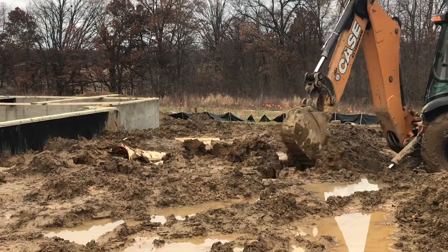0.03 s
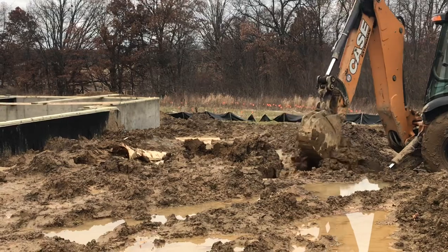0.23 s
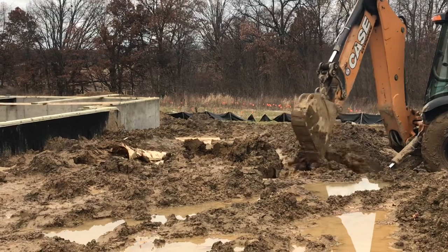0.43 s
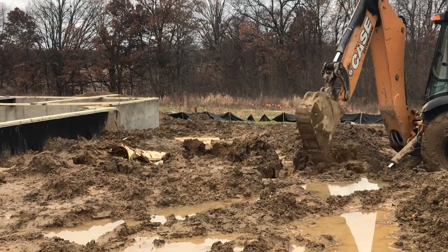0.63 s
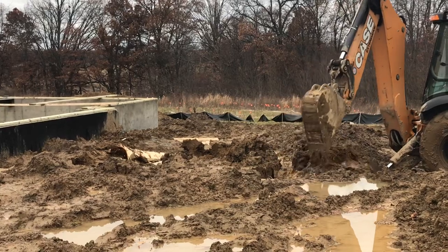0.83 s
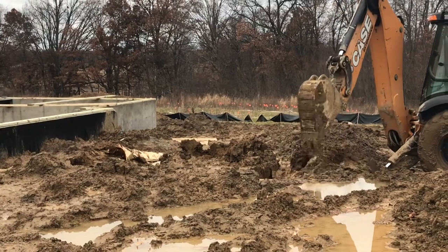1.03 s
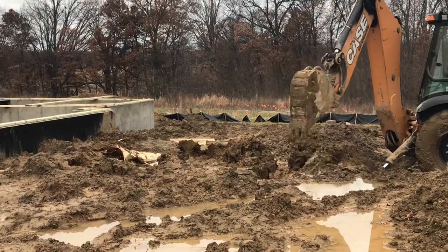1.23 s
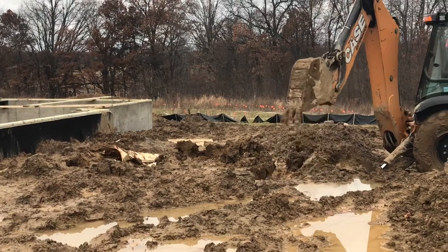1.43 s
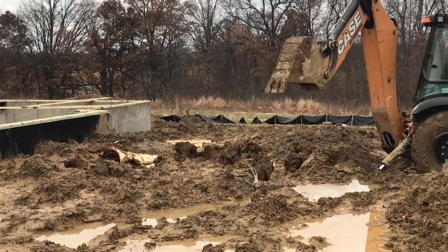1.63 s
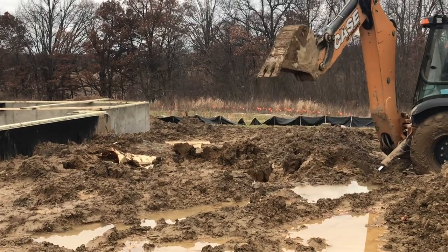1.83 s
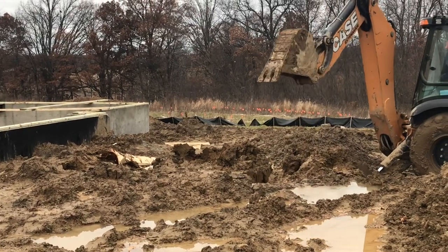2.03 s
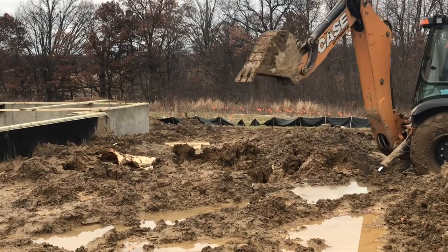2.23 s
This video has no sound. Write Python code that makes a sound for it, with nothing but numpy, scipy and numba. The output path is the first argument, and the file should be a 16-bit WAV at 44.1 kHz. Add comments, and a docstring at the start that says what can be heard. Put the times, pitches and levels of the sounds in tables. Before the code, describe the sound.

Quick, ringing metal bangs come from a digger bucket shaking on loose, squeaky pins at an open building site. The bangs fade to duller chatter with a low hum, while the diesel engine and hydraulic pump run steadily.

```python
"""A backhoe's steel bucket bangs about ten times a second to shake off mud, then lifts and chatters on.
Each bang is a few knocks in the loose pins that make the bucket and arm ring; one hard bang sets the
long boom humming. Dry pins squeal thinly, and a line of trees sends back a faint echo of the steel.
Underneath, a diesel engine and its hydraulic pump run, and the machine rumbles and drones under load."""
import sys
import numpy as np
from scipy import signal
from scipy.fft import rfft, irfft
from scipy.io import wavfile
from scipy.ndimage import uniform_filter1d
from numba import njit

SR = 44100
rng = np.random.default_rng(int(sys.argv[2]) if len(sys.argv) > 2 else 0)


def bounce(signal):
    """Save signal as a 16-bit WAV file at the path given by the first command-line argument."""
    frames = np.transpose(np.atleast_2d(signal))
    limited = np.clip(frames, -1, 1)
    pcm = np.round(limited * 32767).astype(np.int16)
    wavfile.write(sys.argv[1], SR, pcm)


N = 101429


def gain(db):
    """Turn decibels into a number to multiply by."""
    return 10 ** (np.asarray(db) / 20)


def at_hz(hz, table):
    """Look up a pitch between (pitch [Hz], value) points, with octaves evenly spaced."""
    pitches, values = np.array(table, float).T
    return np.interp(np.log(np.maximum(hz, 1)), np.log(pitches), values)


def over_time(table):
    """Join (time [s], value) points with straight lines."""
    return np.interp(np.arange(N) / SR, *np.array(table, float).T)


def coloured(sound, table):
    """Turn each pitch up or down by the table, then set the average strength (rms) to 1."""
    hz = np.arange(len(sound) // 2 + 1) * SR / len(sound)
    shaped = irfft(rfft(sound) * gain(at_hz(hz, table)), len(sound))
    return shaped / shaped.std()


def wobble(per_s):
    """A random drift, about 1 in size, that takes a new direction per_s times a second."""
    step = int(SR / per_s)
    drift = uniform_filter1d(np.repeat(rng.standard_normal(N // step + 2), step), step)[:N]
    return drift / drift.std()


def tone(hz):
    """A pure tone of strength (rms) 1 that follows a moving pitch."""
    return np.sqrt(2) * np.sin(2 * np.pi * np.cumsum(hz) / SR)


@njit
def resonate(turn, keep, when, size):
    """Add up fading notes. when and size have a row for each knock and a column for each note."""
    out, push = np.zeros(N), np.zeros(N)
    for note in range(len(turn)):
        push[:] = 1e-18
        for knock in range(len(when)):
            if 0 <= when[knock, note] < N:
                push[when[knock, note]] += size[knock, note] * np.sin(turn[note])
        a, b = 2 * keep[note] * np.cos(turn[note]), keep[note] ** 2
        last, before = 0., 0.
        for i in range(N):
            last, before = (push[i] - b * before) + a * last, last
            out[i] += last
    return out


def ring(hz, ring_s, times, db):
    """Strike notes, each pushed one way or the other; ring_s is the time to fade by 60 dB."""
    keep = np.exp(-np.log(1000) / (np.maximum(ring_s, .005) * SR))  # share left after each sample
    way = np.sign(rng.standard_normal(np.shape(db)))
    return resonate(2 * np.pi * hz / SR, keep, (times * SR).astype(np.int64), np.sqrt(2) * way * gain(db))


# Tone colour of the exhaust (pitch [Hz], relative level [dB])
EXHAUST_COLOUR = [(30, -24), (75, -24), (160, 7), (240, 7), (400, -39), (1000, -8), (4000, -35),
                  (16000, -75)]

def diesel(speed, firing_hz=78.7, level_db=-48, uneven_db=3.5):
    """Each firing sends a puff down the exhaust, some stronger than others."""
    firings = np.diff(np.floor(np.cumsum(firing_hz * speed) / SR), prepend=0)
    puffs = firings * gain(uneven_db * rng.standard_normal(N))
    return gain(level_db) * coloured(puffs, EXHAUST_COLOUR)


# Tones in the pump's whine (multiple of the lowest pitch, level [dB])
PUMP_TONES = [(1, -47.5), (2, -48), (3, -53), (4, -50)]

def pump(speed, pitch_hz=347.4, flutter_db=4.0):
    """The hydraulic pump whines as it spins; each of its tones flutters in level."""
    return sum(gain(db + flutter_db * wobble(17)) * tone(multiple * pitch_hz * speed)
               for multiple, db in PUMP_TONES)


# Tone colour of the rumble (pitch [Hz], relative level [dB])
RUMBLE_COLOUR = [(25, -17), (70, 5.5), (110, -9.5), (170, 1), (260, -7), (440, -21.5), (650, -10.5),
                 (1100, -18), (1500, -15), (2200, -19.5), (5000, -31), (10000, -39.5), (16000, -44.5)]
# How loud the rumble is (time [s], level [dB])
RUMBLE_LEVEL = [(0, -32.5), (.2, -30.5), (.4, -34.5), (1.7, -35), (2.0, -31.5), (2.3, -35)]

def rumble():
    """The moving machinery makes a broad, low noise."""
    return gain(over_time(RUMBLE_LEVEL)) * coloured(rng.standard_normal(N), RUMBLE_COLOUR)


def machine():
    """Engine and pump share a shaft, so their speeds waver together over the rumble."""
    speed = 1 + 0.00084 * wobble(6.4)
    return diesel(speed) + pump(speed) + rumble()


# Tone colour of the drone (pitch [Hz], relative level [dB])
DRONE_COLOUR = [(100, -23), (150, 5), (172, 4), (215, -3.5), (280, -3), (400, -47), (1500, -51)]
# How loud the drone is (time [s], level [dB])
DRONE_LEVEL = [(0, -45), (.9, -60), (1.27, -24), (1.7, -37), (1.93, -41), (2.12, -28), (2.3, -33)]

def drone():
    """A low, hollow hum swells as the arm takes the load."""
    return gain(over_time(DRONE_LEVEL)) * coloured(rng.standard_normal(N), DRONE_COLOUR)


def squeal(hz, curve, gain_db, flicker_db=1, waver=0.0011):
    """A dry pin sings on one rough, flickering note while it turns."""
    level = np.interp(np.arange(N) / SR, *np.array(curve).T, left=-np.inf, right=-np.inf)
    grit = 1 + .2 * wobble(310)
    loudness = gain(level + gain_db + flicker_db * wobble(34.7))
    return loudness * grit * tone(hz * (1 + waver * wobble(240)))


# How the low and the high squeal swell and fade (time [s], relative level [dB])
LOW_SQUEAL_LEVEL = [(.21, -54), (.25, -40), (.36, -76), (.9, -72), (.97, -34), (1.02, -42), (1.09, -42),
                    (1.11, -36), (1.14, -41), (1.174, -44), (1.196, -50), (1.246, -33.5), (1.278, -53),
                    (1.308, -33), (1.38, -36.5), (1.426, -31), (1.444, -38.5), (1.484, -32), (1.584, -45),
                    (1.618, -37), (1.664, -40), (1.73, -89), (1.768, -47), (1.796, -39), (1.83, -53),
                    (1.878, -29), (1.92, -47), (1.966, -76), (2.008, -44), (2.05, -67)]
HIGH_SQUEAL_LEVEL = [(0.15, -71), (0.186, -92), (0.222, -38), (0.258, -41), (0.34, -69), (0.454, -72),
                     (0.484, -55), (0.526, -34.5), (0.572, -61), (0.612, -31.5), (0.68, -83), (0.71, -41),
                     (0.844, -45), (0.892, -72), (0.922, -42), (1.056, -48), (1.082, -67), (1.134, -34),
                     (1.196, -48), (1.22, -33.5), (1.272, -55), (1.334, -32.5), (1.442, -46.5),
                     (1.634, -40.5), (1.71, -79), (1.792, -42), (1.824, -69.5), (1.87, -42.5),
                     (1.974, -80.5), (2.0, -48)]
# Higher tones that jingle along (pitch [Hz], level next to the high squeal [dB])
JINGLE_TONES = [(10150, -16), (11130, -14), (13740, -18), (14700, -16), (15280, -20)]

def pins(low_hz=5529, high_hz=9866, low_db=-3, high_db=-0.5):
    """The dry pins give two squeals; unsteady jingling tones follow the higher one."""
    low = squeal(low_hz, LOW_SQUEAL_LEVEL, low_db)
    high = squeal(high_hz, HIGH_SQUEAL_LEVEL, high_db)
    jingle = sum(squeal(hz, HIGH_SQUEAL_LEVEL, high_db + db, flicker_db=4, waver=.0035)
                 for hz, db in JINGLE_TONES)
    return low + high + jingle


# Tone colour of the bucket's plates (pitch [Hz], relative level in a band 1 Hz wide [dB])
PLATE_COLOUR = [(40, -67), (85, -53), (115, -26.5), (200, -32), (310, -28.5), (420, -38.5), (600, -23),
                (780, -28), (1000, -26), (1250, -31), (1600, -28), (2100, -34), (3100, -36), (4300, -42.5),
                (6500, -49.5), (8500, -58), (12000, -62.5), (16000, -69)]
# How long the plates ring (pitch [Hz], ring time [s])
PLATE_RING_TIME = [(100, 0.16), (300, 0.23), (800, .16), (2500, 0.13), (7000, 0.1), (15000, 0.17)]

def plate_notes(count=800):
    """Steel plates ring at many crowded notes: rows of (pitch [Hz], level [dB], ring time [s])."""
    edges = np.linspace(np.sqrt(50), np.sqrt(16000), count + 1) ** 2
    width = np.diff(edges)
    hz = edges[:-1] + width * rng.random(count)
    ring_s = at_hz(hz, PLATE_RING_TIME) * np.exp(0.1 * rng.standard_normal(count))
    db = at_hz(hz, PLATE_COLOUR) + 10 * np.log10(width)
    return np.column_stack([hz, db, ring_s])


def strike_spots(hz, count, group=7, depth_db=2.5, full_hz=3000):
    """Each knock lands on a new spot and favours its own groups of high notes; gives dB changes."""
    uneven = uniform_filter1d(rng.standard_normal((count, len(hz))), group, axis=1) * np.sqrt(group)
    return depth_db * uneven * np.minimum(hz / full_hz, 1)


# Knocks in the loose pins (time [s], relative level [dB], extra bass [dB], clang [dB], sizzle [dB])
KNOCKS = [ (0.199, -30, 12, 9.5, -14), (0.212, -20.5, 13, -0.5, 4), (.222, -29.5, -1, 12.5, 16),
          (0.237, -26, 14.5, -20, 3), (0.447, -33, 9, -3.5, -12), (.481, -21.5, 5, 11.5, 10),
          (0.486, -11.5, 2, -20, -1.5), (.588, -23, -2, 10.5, 4), (0.599, -15.5, 9, 3.5, 9.5),
          (0.615, -35, 24, -14, -13), (0.691, -28.5, -15, 0, -1), (.705, -10, 1.5, -1.5, 3),
          (.732, -26, 1, 11.5, 18.5), (0.776, -22, 8.5, 2, 5), (.802, -23, 3, 12.5, 19),
          (.814, -12, 2.5, -12, -10.5), (.908, -24.5, 4, 3, 7), (.914, -14, 6, 4.5, 3.5),
          (.929, -19, 4, 7, 10.5), (0.976, -27, 14, 8.5, 12.5), (1.009, -22.5, 5.5, 4, -2),
          (1.019, -14.5, 5, -1.5, 2), (1.099, -18.5, 9.5, 4.5, 4), (1.119, -14, 2.5, 1, 5),
          (1.189, -32.5, -3, 13.5, 19), (1.201, -13.5, 6, 1, -2), (1.211, -27.5, -8, -1, 17),
          (1.304, -14.5, 4, 3, 10), (1.317, -13.5, 5, -1.5, 2), (1.341, -19.5, 8.5, 2, 5.5),
          (1.391, -15.5, 2, -5.5, -16), (1.401, -13, 2, -1, 2.5), (1.429, -39, 21.5, -12, -8),
          (1.466, -14.5, -13, 5.5, 9.5), (1.484, -13, 1, -4.5, 3.5), (1.520, -14.5, 1.5, -2, 1),
          (1.578, -29.5, 7, 3.5, 1), (1.592, -23.5, -0.5, -1, 0), (1.687, -34.5, 4, -6, -19),
          (1.751, -31, 11, -1.5, -15), (1.786, -37.5, -5, 4, -10), (1.829, -26, 4.5, 4.5, -1),
          (1.848, -19, -0.5, -4, -5.5), (1.966, -23.5, -27, -7.5, -35), (1.99, -33, 11, -2, -15),
          (2.010, -24, 5, -9.5, -30), (2.056, -31.5, 4, 1.5, -41), (2.080, -27.5, 6, -14, -4.5),
          (2.145, -26, -14, -0.5, -24), (2.191, -36.5, -14, 0, -26), (2.225, -26.5, 8.5, -13.5, -15)]
# Where a knock's bass ends, its middle and clang start and end, and its sizzle starts (pitch [Hz])
BAND_EDGES = [220, 550, 1000, 2200, 4000, 7500]
# Clear notes of the bucket and arm (pitch [Hz], relative level [dB], ring time [s])
CLEAR_NOTES = [(118, -19, .45), (169, -24.5, .55), (258, -24, .42), (598, -17.5, .22), (886, -22, .35),
               (1440, -20, .16), (1667, -18.5, .2), (2010, -22, .18), (2790, -16, .16), (2980, -25, .2),
               (3520, -25, .15), (3850, -25.5, .15), (4420, -28.5, .14), (5529, -38, .45), (5790, -34, .22),
               (6918, -39, .14)]
# How long a knock takes to spread through the steel (pitch [Hz], longest delay [s])
SPREAD_TIME = [(100, 0.01188), (700, 0.006917), (2500, 0.0055), (10000, .004)]

def bucket(scatter_db=2.0):
    """Every knock rings the same steel notes in its own mix; low notes tend to answer last."""
    hz, db, ring_s = np.vstack([plate_notes(), CLEAR_NOTES]).T
    knocks = np.vstack([chatter(), KNOCKS])
    force_db = np.array([
        level + np.interp(np.log(hz), np.log(BAND_EDGES), [bass, 0, 0, clang, clang, sizzle])
        for _, level, bass, clang, sizzle in knocks])
    delay = rng.random(force_db.shape) * at_hz(hz, SPREAD_TIME)
    mix_db = strike_spots(hz, len(knocks)) + scatter_db * rng.standard_normal(force_db.shape)
    return ring(hz, ring_s, knocks[:, :1] + delay, db + force_db + mix_db)


# Single notes that stand out of the bangs (time [s], pitch [Hz], level [dB])
PINGS = [(0.201, 1718, -14), (.212, 756, -10), (0.224, 161.5, -14.5), (.232, 552, -15), (.234, 845, -16),
         (.488, 2280, -28), (.497, 990, -14), (0.594, 2280, -13), (.599, 554, -15), (0.711, 1223, -20.5),
         (.715, 2800, -11.5), (.808, 2820, -21), (0.812, 1365, -18), (.927, 2270, -18), (.488, 597, -6),
         (0.488, 293, -13.5), (0.605, 1730, -17), (0.733, 5680, -22), (0.733, 6950, -20.5),
         (0.8, 2990, -29), (0.821, 1000, -13), (.914, 328, -11), (.916, 8740, -27.5), (.930, 602, -6.5),
         (1.1, 3070, -15), (1.121, 602, -10), (1.490, 350, -14), (1.214, 287, -16), (1.304, 3190, -13),
         (1.319, 503, -10.5), (1.433, 162, -14), (1.467, 1650, -10), (1.469, 1430, -10.5),
         (1.485, 845, -7.5), (1.848, 123, -19), (1.993, 726, -17)]
# How long they ring (pitch [Hz], ring time [s])
PING_RING_TIME = [(150, 0.2), (600, 0.057), (2000, 0.034), (7000, 0.062)]

def pings():
    """Some knocks land squarely and bring out one short hollow note or ping."""
    sound = np.zeros(N)
    for time, hz, db in PINGS:
        pitch = np.array([hz], float)
        sound += ring(pitch, at_hz(pitch, PING_RING_TIME), np.array([[time]]), np.array([[db]]))
    return sound


# Tone colour of the echo (pitch [Hz], relative level [dB])
ECHO_COLOUR = [(100, 8), (1000, -19), (4000, 6), (15000, -3)]

def tree_echo(sound, level_db=-23.5, build_s=0.011, fade_s=0.42):
    """Trees and walls scatter the sound back as a faint, smeared echo."""
    t = np.arange(SR) / SR
    fade = np.exp(-np.log(1000) * t / fade_s)
    build = np.minimum(t / build_s, 1) ** 2
    echo = coloured(rng.standard_normal(SR), ECHO_COLOUR) * fade * build
    return gain(level_db) * signal.fftconvolve(sound, echo / np.linalg.norm(echo))[:N]


# Deep notes of the boom, the big beam that carries the arm (pitch [Hz], level [dB], ring time [s])
BOOM_NOTES = [(62, -23, 0.26), (118.7, -10.5, 0.58), (173.33, -23, 1)]

def boom(bang_s=1.482):
    """One hard bang shakes the whole boom, which shudders on unevenly."""
    hz, db, ring_s = np.array(BOOM_NOTES, float).T.copy()
    shudder = 1 + .2 * wobble(70)
    return shudder * ring(hz, ring_s, np.full((1, len(hz)), bang_s), db[None, :])


# Tone colour of the small, dull knocks (extra bass [dB], clang [dB], sizzle [dB])
CHATTER_BANDS = [1.9, 0, -37]

def chatter(start_s=1.9, per_s=36, count=17, level_db=-39.5, scatter_db=6.5):
    """The slack joints rattle as the arm lifts: more rows of knocks for bucket() to play."""
    times = start_s + (np.arange(count) + rng.random(count)) / per_s
    db = level_db + scatter_db * rng.standard_normal(count)
    return np.column_stack([times, db, np.tile(CHATTER_BANDS, (count, 1))])


def scene():
    """The banging steel, its echo, the squealing pins and the running machine, in one channel."""
    steel = bucket() + pings()
    return (steel + tree_echo(steel) + boom() + pins() + machine() + drone())[None, :]


def record(dry):
    """Thin out the deepest bass, round off the loudest peaks and cut the very highest sounds."""
    low_cut_hz, ceiling, top_hz = 69, .97, 15800
    thin = signal.sosfilt(signal.butter(2, low_cut_hz, "high", fs=SR, output="sos"), dry)
    rounded = thin / (1 + (thin / ceiling) ** 6) ** (1 / 6)
    return signal.sosfilt(signal.ellip(10, .2, 80, top_hz, fs=SR, output="sos"), rounded)


dry = scene()
out = record(dry)
bounce(out)
```